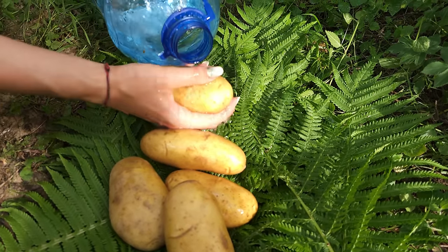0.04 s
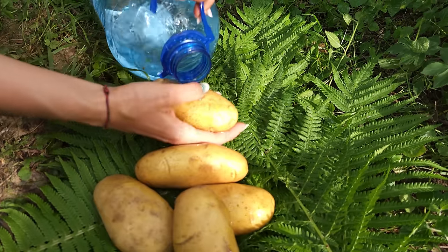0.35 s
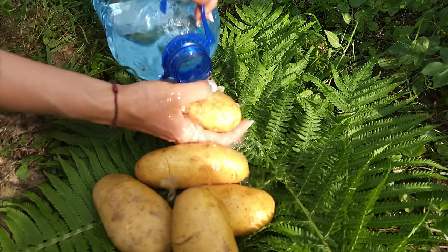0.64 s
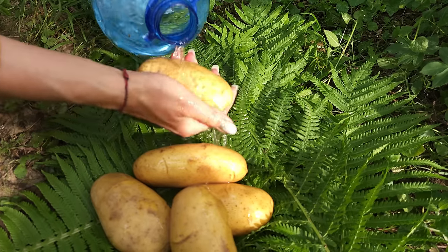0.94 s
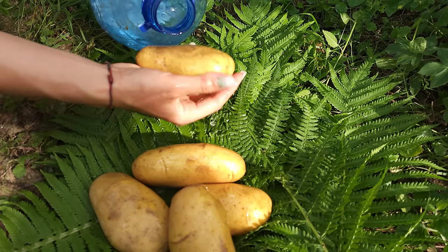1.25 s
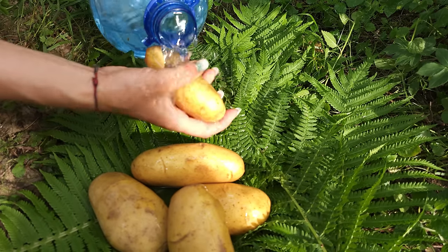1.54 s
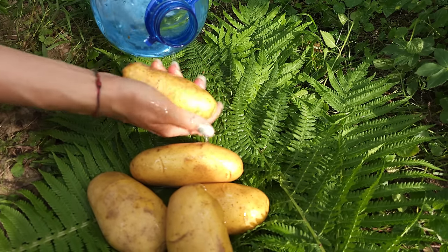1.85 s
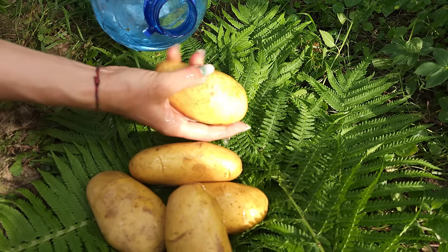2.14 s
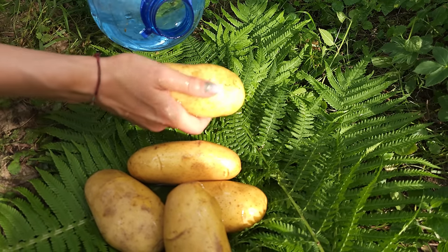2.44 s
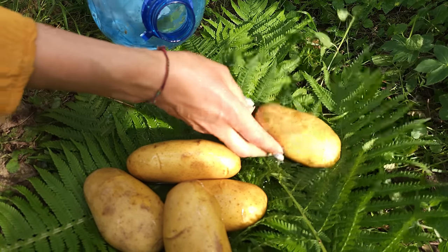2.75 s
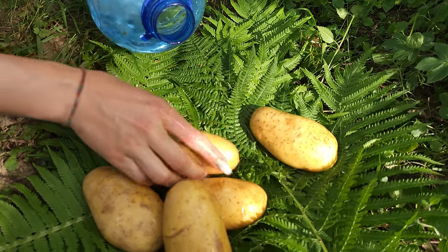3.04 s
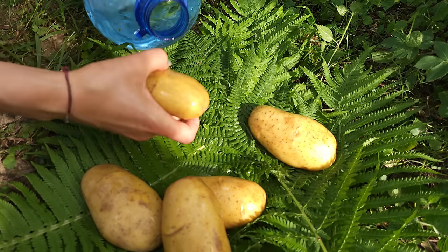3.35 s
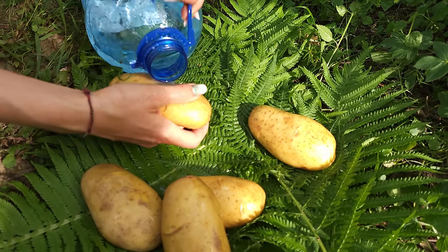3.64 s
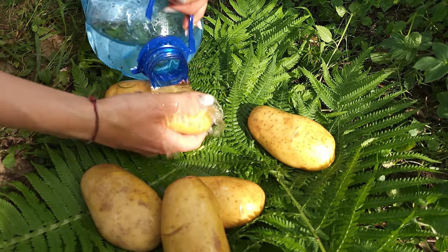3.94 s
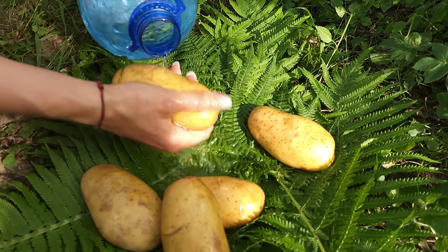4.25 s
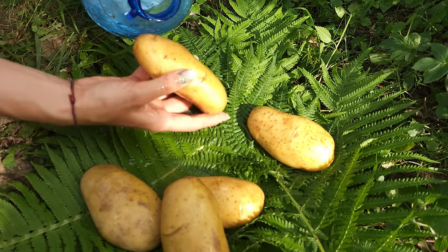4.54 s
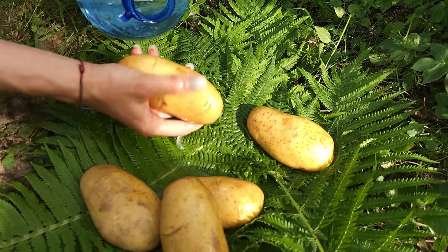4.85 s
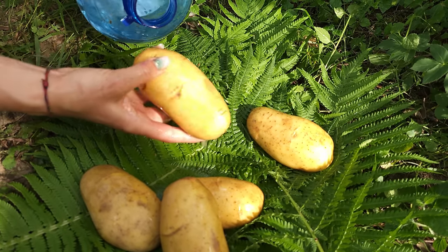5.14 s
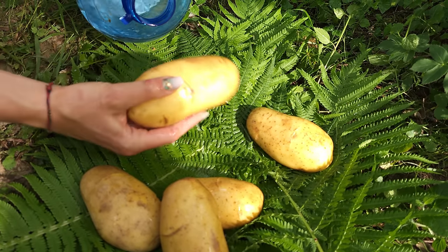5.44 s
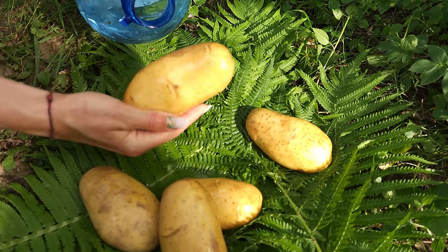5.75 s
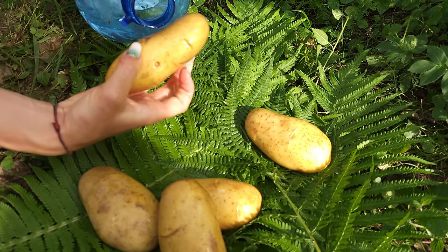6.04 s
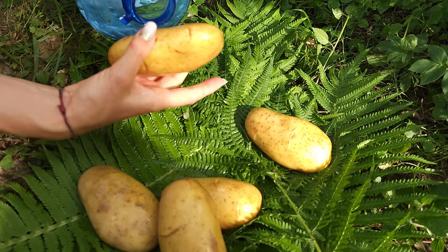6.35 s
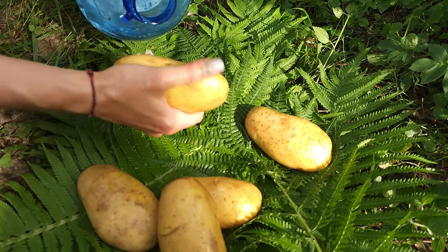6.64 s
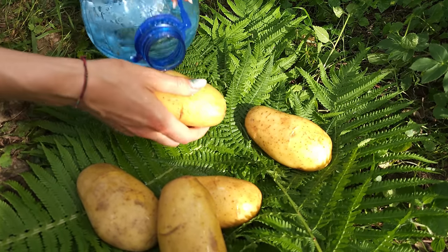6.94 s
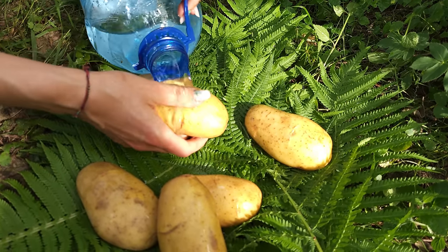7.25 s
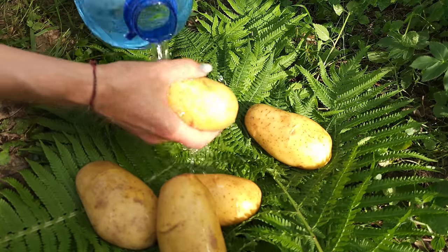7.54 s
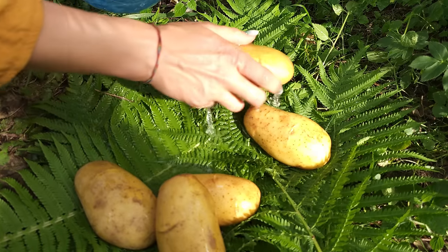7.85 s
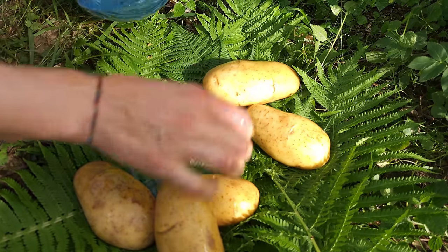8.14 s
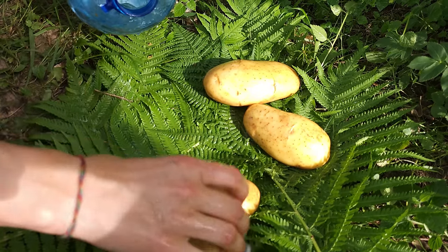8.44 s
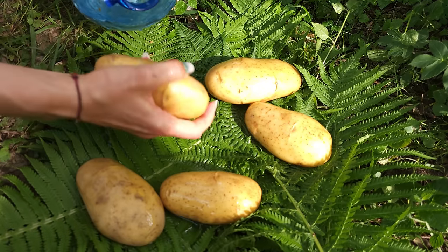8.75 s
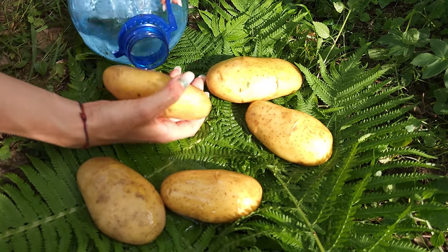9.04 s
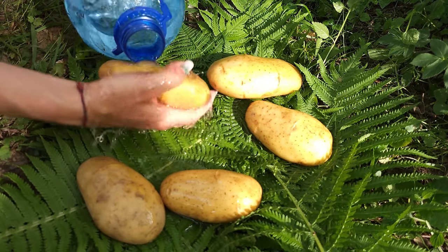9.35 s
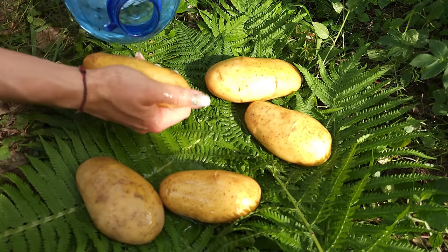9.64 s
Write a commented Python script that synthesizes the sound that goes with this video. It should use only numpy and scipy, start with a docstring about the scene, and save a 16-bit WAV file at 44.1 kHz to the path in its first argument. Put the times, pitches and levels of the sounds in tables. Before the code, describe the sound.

Water splashes from a thumping plastic bottle in short pours as wet hands rub and rinse potatoes.

```python
"""A soft brush of a hand and a hollow boom come first: potatoes are being rinsed over ferns, with water
tipped from a big plastic bottle. Its flexing walls crack and excite damped modes, while the water
inside sloshes and gulps air. The stream trickles over skin and peel as trapped bubbles resonate,
and drops tick on the leaves. Wet hands rub by stick-slip friction and set the potatoes down with
dull thuds, over a faint rumble and hiss."""
import sys
import numpy as np
from scipy import signal
from scipy.fft import rfft, irfft, next_fast_len
from scipy.io import wavfile

SR = 44100
rng = np.random.default_rng(int(sys.argv[2]) if len(sys.argv) > 2 else 0)


def generate_wav(sig):
    """Save sig (samples, or channels by samples) to the path in sys.argv[1] as 16-bit PCM at SR."""
    pcm = np.round(np.clip(np.atleast_2d(sig).T, -1, 1) * 32767).astype(np.int16)
    wavfile.write(sys.argv[1], SR, pcm)


N = 427769

# Spectra of the air, wet rubbing, dragging skin and sloshing water: frequency_hz, relative_db
AIR_SPECTRUM = [(20, -2), (100, 4), (230, -6), (430, -16), (900, -26), (1300, -20), (16000, -28.5)]
RUB_SPECTRUM = [(400, -13), (900, -10), (1300, 0), (2500, -4), (3200, 1), (7600, 1), (10500, -5),
                (11700, -1), (13000, -5), (16000, -7.5)]
DRAG_SPECTRUM = [(950, -13), (1280, -5), (3500, -14.5)]
SLOSH_SPECTRUM = [(25, -29.5), (60, 0), (150, 8), (230, -10), (340, -21), (500, -18), (900, -35.5)]
# Narrow hisses in the background: centre_hz, level_db
HISS_BANDS = [(4630, -73), (11550, -85.5)]
# Potatoes set down on the ferns: start_s, peak_db
SET_DOWNS = [(2.785, -51.5), (7.978, -47)]
# Hand strokes over peel and ferns, skin drags, fingertip squeaks: middle_s, half_length_s, level_db
HAND_STROKES = [(0.237, 0.08, -56.5), (1.108, 0.05, -61.5), (2.13, 0.018, -58.5), (2.782, 0.036, -51),
                (3.326, 0.061, -56), (3.72, 0.24, -62), (4.102, 0.12, -56.5), (4.55, 0.15, -64.5),
                (4.755, 0.054, -62.5), (5.01, 0.054, -63), (6.95, 0.11, -67.5), (7.985, 0.021, -50),
                (8.439, 0.042, -61.5)]
SKIN_DRAGS = [(2.2, 0.32, -69.5), (4.6, 0.13, -67.5)]
FINGER_SQUEAKS = [(2.4, 0.022, -69)]
# Water splats on the leaves: start_s, level_db, t60_s
LEAF_SPLATS = [(0.99, -43, 0.15), (1.642, -50.5, 0.12), (7.722, -38.5, 0.14), (9.599, -45.5, 0.29),
               (9.638, -45, 0.08)]
# Drops on the leaves and larger bubbles in the cupped hand: start_s, relative_peak_db, pitch_hz
LEAF_DROPS = [(0.3082, -41.5, 11740), (0.5173, -39.5, 11600), (0.5672, -41, 7060), (1.4662, -44, 12300),
              (1.6415, -40.5, 6800), (1.6767, -36, 6540), (4.2742, -42, 11600), (4.3395, -40.5, 7040),
              (9.226, -40.5, 11300), (9.3915, -31.5, 6520)]
HAND_PLINKS = [(0.573, -43, 1770), (0.591, -51.5, 1260), (0.807, -52.5, 1400), (0.959, -42, 2300),
               (1.055, -49, 3400), (1.085, -58, 830), (1.235, -63, 990), (1.443, -50, 3130),
               (1.643, -41, 2870), (1.694, -49, 960), (1.73, -52.5, 3460), (1.845, -47, 2720),
               (4.036, -41.5, 2560), (4.059, -36, 4270), (4.208, -45, 1260), (6.189, -58, 1410),
               (7.392, -41.5, 1950), (7.422, -39.5, 3720), (7.6156, -45, 4650), (9.4804, -46, 2870),
               (9.492, -46.5, 2020)]
# Gushes from the tipped bottle hit the hand: start_s, level_db
POURS = [(0.565, -54), (0.975, -61.5), (4.02, -53), (7.388, -55.5), (9.37, -60.5), (9.6, -56)]
# Water gathers in the cupped hand, or sways in the swung bottle: middle_s, half_length_s, level_db
HAND_GURGLES = [(0.66, 0.17, -66.5), (1.07, 0.16, -65.5), (9.62, 0.048, -50.5)]
BOTTLE_SWAYS = [(1.1, 0.98, -59), (8.94, 0.047, -51.5), (9.45, 0.61, -60.5)]
# Air gulps into the bottle: start_s, level_db, pitch_hz, t60_s
AIR_GULPS = [(0.675, -40, 40.6, 0.27), (0.993, -39.5, 156, 0.2), (1.141, -40.5, 171, 0.17),
             (1.543, -42.5, 114.7, 0.42), (1.719, -44, 152, 0.29), (7.391, -43, 37.4, 0.61),
             (7.811, -28.5, 857, 0.1), (9.087, -39, 95, 0.22), (9.372, -24.5, 100, 0.15)]
# Flexes of the bottle wall; wall and crack are relative to the boom, before their trims:
# start_s, boom_db, boom_hz, wall_db, crack_db, ring_time_ratio
WALL_FLEXES = [(0.325, -41, 177, -20, -31, 1.1), (0.673, -32.5, 126.7, -27.5, -19, 0.91),
               (3.544, -21.5, 168.1, -15, -20, 1.12), (3.952, -27, 148, -6.5, -8, 0.77),
               (4.142, -27.5, 158.9, -9, 0, 1.05), (6.071, -32.5, 138.3, -32, -27, 1.3),
               (6.985, -36.5, 144, -25, -24, 0.42), (7.034, -34.5, 166.6, -12.5, -24, .8),
               (7.18, -24, 161.5, -9.5, -12.5, .65), (7.464, -28, 134.6, -10.5, -3.5, 1.1),
               (7.802, -24, 181.2, -15.5, -19.5, 0.56), (7.815, -19, 140, -16, -16, 1.4),
               (8.962, -30.5, 153.4, -14, -30, 0.65), (9.27, -29.5, 156.6, -9.5, -32, 0.49),
               (9.349, -29.5, 128.7, -4, -10, 0.61), (9.662, -37, 170, -12.5, -33, 1.1)]
# Small creases that pop and hardly move the water: start_s, reference_db
CRINKLES = [(4.081, -43.5), (6.253, -58.5), (6.332, -50.5), (6.342, -52.5), (6.474, -52.5), (6.526, -51),
            (8.975, -53.5)]
# Modes of the filled bottle: ratio_to_boom_pitch, relative_db, base_t60_s
BOOM_MODES = [(.58, -17, 0.4), (.84, -8.5, 0.31), (0.999, -1.5, 0.2), (1.239, -8, 0.3), (1.62, -14.5, 0.29)]
# Modes of the bare wall, lowered by WALL_TUNING: base_hz, relative_db, base_t60_s
WALL_MODES = [(282.3, 1, 0.13), (452, 4, 0.14), (520, 1.5, 0.15), (605, -7, 0.16), (800, -7, 0.14)]
# Upper resonances of the plastic: centre_hz, relative_db
CRACK_RESONANCES = [(690, -12), (990, 6.5), (1200, 14.5), (1430, 10.5), (1600, 8.5), (2020, 13.5),
                    (2340, 0.5), (2670, -18), (3500, -7.5)]
# Spectrum of the bright snap of a crease: frequency_hz, relative_db
SNAP_SPECTRUM = [(2100, -15), (2700, -0.5), (3900, -5.5), (5700, -22.5), (7000, -19.5), (14000, -33)]

EAR_LAG_S, CUTOFF_HZ = 0.00017, 15900
WALL_PAN_DB, CRACK_PAN_DB, HAND_PAN_DB = 1.5, 3.5, -1.5  # left minus right
GUSH_RISE_S, DRIBBLE_RISE_S, TYPICAL_GUSH_DB = 0.013, 0.069, -56
BUBBLE_RANGE_DB, BUBBLE_GLIDE = 28, 0.14
STRAYS_PER_S, STRAY_PEAK_DB = 55, -37.5  # rate and greatest peak in a typical gush
STRAY_LOW_HZ, STRAY_HIGH_HZ = 4260, 12900
SAG_SHARE, SAG_S, WAVER_SHARE, WAVERS_PER_S = 0.068, 0.047, 0.07, 90
CREASE_RISE_S, CRACK_WIDTH_HZ, CRACK_DETUNE = 0.003, 82, 0.036
WALL_TUNING, WALL_TRIM_DB, CRACK_TRIM_DB, SNAP_TRIM_DB = 0.9, 7.5, -12.5, 6
REBOUND_S, REBOUND_DB = 0.02624, -8.5  # the wall springs back; level relative to the boom
BOTTLE_LOW_HZ = 44.7  # the bottle's sound is cut below this


def from_db(db):
    """Amplitude grows tenfold with every 20 dB."""
    return 10 ** (np.asarray(db) / 20)


def unit_rms(x):
    """Normalisation to a mean power of 1."""
    return x / np.sqrt(np.mean(x ** 2) + 1e-20)


def add(out, start_s, sound):
    """Superposition: a sound adds to the mix from its start time."""
    start = max(round(start_s * SR), 0)
    out[:, start:start + sound.shape[-1]] += sound[..., :N - start]


def drift(per_s):
    """Random modulation: a line through chance values, rms 1."""
    knots = rng.standard_normal(4000)
    return unit_rms(np.interp(np.arange(N) / SR * per_s, np.arange(len(knots)), knots))


def wobble(t, per_s, count):
    """Independent random modulations, each of spread about 1."""
    knots = rng.standard_normal((count, 64))
    return np.array([np.interp(t * per_s, np.arange(len(row)), row) for row in knots])


def struck(t, rise_s, t60_s):
    """Damping: after a quick rise, amplitude decays exponentially."""
    return (1 - np.exp(-t / rise_s)) * from_db(-60 * t / t60_s)


def swells(rows):
    """Gaussian envelopes add into one smooth amplitude curve."""
    clock = np.arange(0, N, 20) / SR
    level = sum(from_db(db) * np.exp(-np.minimum(((clock - middle_s) / half_s) ** 2, 20))
                for middle_s, half_s, db in rows)
    return np.interp(np.arange(N) / SR, clock, level)


def surges(rows, rise_s, t60_s):
    """Damped envelopes, one for each (start_s, level_db), add into one amplitude curve."""
    clock = np.arange(0, N, 20) / SR
    level = sum(from_db(db) * struck(np.maximum(clock - start_s, 0), rise_s, t60_s)
                for start_s, db in rows)
    return np.interp(np.arange(N) / SR, clock, level)


def coloured(x, spectrum):
    """Spectral shaping: each frequency is weighted by a gain curve; rms 1."""
    size = next_fast_len(x.shape[-1])
    hz, level_db = np.transpose(spectrum)
    gain = from_db(np.interp(np.log(np.fft.rfftfreq(size, 1 / SR) + 1), np.log(hz), level_db))
    return unit_rms(irfft(rfft(x, size) * gain, size)[..., :x.shape[-1]])


def resonate(x, hz, q):
    """A resonator passes a band of width hz / q."""
    return signal.lfilter(*signal.iirpeak(hz, q, fs=SR), x)


def panned(pan_db):
    """Interaural level difference, as left and right gains."""
    return from_db(pan_db * np.array([[.5], [-.5]]))


def at_ears(x):
    """Interaural time difference: sound arrives on the left a little before the right."""
    n = np.arange(len(x))
    return np.array([x, np.interp(n - EAR_LAG_S * SR, n, x, left=0)])


def stereo_noise(spectrum, size, apart_hz):
    """Interaural coherence: noise is alike in the bass and mostly unrelated above apart_hz."""
    highpass = signal.butter(1, apart_hz, "high", fs=SR, output="sos")
    separate = signal.sosfilt(highpass, rng.standard_normal((2, size)))
    shared = at_ears(rng.standard_normal(size))
    shared -= .5 * signal.sosfilt(highpass, shared)
    return coloured(shared + separate, spectrum)


def scattered(x, wet_db, t60_s):
    """Early reflections from hand, bottle and ground follow the direct sound."""
    t = np.arange(SR // 20) / SR
    response = rng.standard_normal((2, len(t))) * from_db(-60 * t / t60_s) * (t > .0006)
    response /= np.sqrt(np.sum(response ** 2, axis=1, keepdims=True))
    return at_ears(x) + from_db(wet_db) * signal.oaconvolve(x[None], response, axes=1)[:, :len(x)]


def bubble(t, hz, cycles, glide):
    """Bubble resonance: trapped air rings down and rises in pitch as it nears the surface."""
    age = t * hz / cycles
    return np.sin(2 * np.pi * hz * t * (1 + glide * np.minimum(age, 1))) * from_db(-60 * age)


def swarm(per_s, low_hz, octaves, tilt_db, cycles):
    """A Poisson process: bubbles ring at random on both sides of the hand, with reflections; rms 1."""
    births = np.flatnonzero(rng.random(N) < per_s / SR)
    direct, t = np.zeros((2, N)), np.arange(SR // 25) / SR
    for at, (pitch, softness, place) in zip(births, rng.random((len(births), 3))):
        note = bubble(t, low_hz * 2 ** (octaves * pitch), cycles, BUBBLE_GLIDE)
        gain = from_db(tilt_db * pitch - BUBBLE_RANGE_DB * softness) / np.sqrt(per_s[at])
        add(direct, at / SR, gain * panned(14 * (place - .5)) * at_ears(note))
    reflected = scattered(direct.mean(axis=0), wet_db=9, t60_s=.04)
    return unit_rms(unit_rms(direct) + unit_rms(reflected))


def air():
    """Ambient noise: a faint broadband rumble and hiss, with two high bands that waver in level."""
    out = from_db(-67.5) * stereo_noise(AIR_SPECTRUM, N, apart_hz=820)
    for hz, db in HISS_BANDS:
        q = hz / 650
        band = resonate(resonate(rng.standard_normal((2, N)), hz, q), hz, q)
        out += from_db(db + 1.5 * drift(per_s=19)) * unit_rms(band)
    return out


def thuds():
    """Damped impact: soft ground takes the weight of a potato with one low tone."""
    out, t = np.zeros((2, N)), np.arange(SR // 4) / SR
    thud = at_ears(np.sin(2 * np.pi * 67.6 * t) * struck(t, rise_s=0.004, t60_s=0.17))
    for start_s, peak_db in SET_DOWNS:
        add(out, start_s, from_db(peak_db) * thud / np.max(np.abs(thud)))
    return out


def squeak():
    """Periodic stick-slip: a fingertip on wet peel gives a faint, unsteady tone."""
    hz = 1980 * (1 + .012 * drift(per_s=90))
    return swells(FINGER_SQUEAKS) * at_ears(np.sin(2 * np.pi * np.cumsum(hz) / SR))


def drags():
    """Friction noise: skin judders over the peel with a soft, nasal rasp."""
    return swells(SKIN_DRAGS) * coloured(rng.standard_normal((2, N)), DRAG_SPECTRUM)


def slipping():
    """Irregular stick-slip: the level of wet rubbing comes in uneven spurts."""
    return unit_rms(from_db(3.5 * np.minimum(drift(per_s=110), 2)))


def film_pops(per_s, spread_db, hiss_db, bands):
    """Film rupture: water tears in tiny pitched pops over a smooth hiss; rms 1."""
    sizes = from_db(spread_db * np.minimum(rng.exponential(1, N), 3.5)) * rng.choice([-1, 1], N)
    clicks = sizes * (rng.random(N) < per_s / SR)
    band_of_click = rng.integers(0, bands, N)
    pops = sum(resonate(clicks * (band_of_click == band) + 1e-18, hz, q=hz / 2200)
               for band, hz in enumerate(np.linspace(1800, 15500, bands)))
    pops = scattered(pops, wet_db=1, t60_s=.03)[::-1]  # the fingers are nearer the right ear
    return coloured(unit_rms(pops) + from_db(hiss_db) * rng.standard_normal((2, N)), RUB_SPECTRUM)


def swishes():
    """Friction and impact shape a fine spray of pops: strokes swell and fade, splats start at once."""
    level = (swells(HAND_STROKES) * slipping())[None]
    t = np.arange(SR // 2) / SR
    for start_s, level_db, t60_s in LEAF_SPLATS:
        add(level, start_s, from_db(level_db) * struck(t, 0.00081, t60_s))
    return level * film_pops(per_s=4200, spread_db=4.5, hiss_db=1, bands=8)


def wet_hands(flow_db):
    """Wet friction: fingers crackle and squelch on the peel, and the stream spatters on them."""
    wetness = surges(POURS, DRIBBLE_RISE_S, t60_s=3.1)
    grip = from_db(2.5 * np.tanh(drift(per_s=9)))  # tightens and slackens
    rub = (from_db(-73) + from_db(-16) * wetness) * grip
    spatter = from_db(flow_db + 1.5)
    level = np.hypot(rub, spatter) * slipping()
    crackle = level * film_pops(per_s=550, spread_db=7.5, hiss_db=1.5, bands=16)
    squelches = swarm(per_s=np.full(N, 16), low_hz=1400, octaves=1.4, tilt_db=3, cycles=11)
    return crackle + rub * from_db(-10) * squelches


def stream_db():
    """Exponential run-off sets the stream's level: each pour is a gush and a long dribble."""
    gush = surges(POURS, GUSH_RISE_S, t60_s=0.94)
    dribble = from_db(-18.5) * surges(POURS, DRIBBLE_RISE_S, t60_s=4.4)
    return 20 * np.log10(gush + dribble + 1e-9)


def stray_drops(flow_db):
    """Poisson arrivals, thicker and harder in a gush: rows of start_s, peak_db, pitch_hz."""
    excess_db = flow_db - TYPICAL_GUSH_DB
    expected_count = np.cumsum(STRAYS_PER_S * from_db(excess_db)) / SR
    wait, softness, pitch = rng.random(size=(400, 3)).T
    landings = np.searchsorted(expected_count, np.cumsum(-np.log(1 - wait)))
    peak_db = STRAY_PEAK_DB - 4 * np.minimum(-np.log(1 - softness), 2)
    pitch_hz = STRAY_LOW_HZ * (STRAY_HIGH_HZ / STRAY_LOW_HZ) ** pitch
    return [(at / SR, db + 0.45 * excess_db[at], hz)
            for at, db, hz in zip(landings, peak_db, pitch_hz) if at < N - SR // 100]


def drips(rows, cycles, glide, tick_db, gain_db=0):
    """Drop impact: a bright tick and the short note of an entrained bubble."""
    out, t = np.zeros((2, N)), np.arange(SR // 10) / SR
    onset = 1 - np.exp(-t / 0.00011)  # a very short fade-in softens each drop's tick
    for start_s, peak_db, hz in rows:
        tick = np.diff(rng.standard_normal(len(t) + 1)) * from_db(-60 * t / .012)
        note = (bubble(t, hz, cycles, glide) + from_db(tick_db) * tick) * onset
        sound = scattered(note, wet_db=2, t60_s=0.063)
        add(out, start_s, from_db(peak_db + gain_db) * sound / np.max(np.abs(sound)))
    return out


def gurgle():
    """Larger bubbles resonate lower: a quickly damped crowd forms in the cupped hand."""
    bubbles = swarm(per_s=np.full(N, 130), low_hz=297, octaves=2.6, tilt_db=-7, cycles=14.6)
    return swells(HAND_GURGLES) * bubbles


def trickle():
    """Air entrainment: each gush makes small chirping bubbles, more of them the harder it runs."""
    level = surges(POURS, GUSH_RISE_S, t60_s=0.83)
    per_s = np.clip(300 * np.sqrt(level / from_db(TYPICAL_GUSH_DB)), 100, 1200)
    return level * swarm(per_s, low_hz=1150, octaves=2.2, tilt_db=5, cycles=42)


def slosh():
    """Forced sloshing: swings and booms stir the bottle's water into a lumpy, hollow murmur."""
    stirred = sum(surges([(start_s, boom_db)], rise_s=0.0085, t60_s=0.77 * ring)
                  for start_s, boom_db, *_, ring in WALL_FLEXES)
    level = from_db(-83.5) + swells(BOTTLE_SWAYS) + from_db(-23.5) * stirred
    lumps = from_db(2 * drift(per_s=25))
    return level * lumps * stereo_noise(SLOSH_SPECTRUM, N, apart_hz=1500)


def glugs():
    """Bubble resonance in the bottle: each gulp of air rings and rises slightly in pitch."""
    out, t = np.zeros((2, N)), np.arange(SR // 2) / SR
    onset = 1 - np.exp(-t / 0.0026)
    for start_s, level_db, hz, t60_s in AIR_GULPS:
        note = onset * bubble(t, hz, cycles=hz * t60_s, glide=0.083)
        add(out, start_s, from_db(level_db) * at_ears(note))
    return out


def ringing(modes, t, tuning, ring, detune, rise_s):
    """Modal vibration: damped sines, frequencies scaled by tuning and decay times by ring; peak 1."""
    base, level_db, t60_s = np.transpose(modes)[:, :, None]
    mistune, strength, phase = rng.standard_normal((3, len(modes), 1))
    sag = SAG_SHARE * np.exp(-t / SAG_S)  # the strained wall rings sharp, then relaxes
    waver = WAVER_SHARE * wobble(t, WAVERS_PER_S, len(modes))  # the water shifts
    bend = 1 + detune * mistune + sag + waver
    waves = np.sin(2 * np.pi * tuning * base * np.cumsum(bend, axis=1) / SR + np.pi * phase)
    sound = np.sum(from_db(level_db + 2 * strength) * waves * struck(t, rise_s, t60_s * ring), axis=0)
    return at_ears(sound / np.max(np.abs(sound)))


def crease(t):
    """Buckling: a crease runs across the plastic and excites resonances that shift with each grip."""
    buckling = rng.standard_normal(len(t)) * struck(t, CREASE_RISE_S, t60_s=.036)
    tunings = 1 + CRACK_DETUNE * rng.standard_normal(len(CRACK_RESONANCES))
    sound = sum(from_db(db) * resonate(buckling, hz * tuning, q=hz / CRACK_WIDTH_HZ)
                for (hz, db), tuning in zip(CRACK_RESONANCES, tunings))
    return unit_rms(at_ears(sound))


def flex(out, start_s, boom_db, boom_hz, wall_db, crack_db, snap_db, ring):
    """Impulse response of the bottle: a crack and snap, a hollow wall ring, a boom and its rebound."""
    t = np.arange(SR // 3) / SR
    brief = t[:SR // 10]
    boom = ringing(BOOM_MODES, t, boom_hz, ring, detune=0.019, rise_s=0.0021)
    wall = ringing(WALL_MODES, t, WALL_TUNING, ring, detune=0.0433, rise_s=0.00071)
    wall *= from_db(wall_db + WALL_TRIM_DB) * panned(WALL_PAN_DB)
    crack = from_db(crack_db + CRACK_TRIM_DB) * crease(brief) * panned(CRACK_PAN_DB)
    snap = stereo_noise(SNAP_SPECTRUM, len(brief), apart_hz=2960)
    snap *= from_db(snap_db + SNAP_TRIM_DB) * struck(brief, CREASE_RISE_S, t60_s=0.027)
    rebound = ringing(BOOM_MODES, t, boom_hz, ring, detune=0, rise_s=0.0007)
    add(out, start_s, from_db(boom_db) * (boom + wall))
    add(out, start_s, from_db(boom_db) * (crack + snap))
    add(out, start_s + REBOUND_S, from_db(boom_db + REBOUND_DB) * rebound)


def bottle():
    """Radiation from a thin shell: large flexes and small crinkles, with the deepest bass cut away."""
    out = np.zeros((2, N))
    for start_s, boom_db, boom_hz, wall_db, crack_db, ring in WALL_FLEXES:
        snap_db = 1.23 * crack_db + 3  # the harder the crack, the brighter
        flex(out, start_s, boom_db, boom_hz, wall_db, crack_db, snap_db, ring)
    for start_s, db in CRINKLES:
        flex(out, start_s, boom_db=db - 2, boom_hz=140.7, wall_db=-10, crack_db=2, snap_db=12.5, ring=1)
    return signal.sosfilt(signal.butter(2, BOTTLE_LOW_HZ, "high", fs=SR, output="sos"), out)


def scene():
    """Superposition of hands, water and bottle, close by, over the ambient noise."""
    flow_db = stream_db()
    ticks = drips(LEAF_DROPS, cycles=19.7, glide=0.017, tick_db=-11.5, gain_db=5.0)
    plinks = drips(HAND_PLINKS, cycles=18, glide=0.064, tick_db=-18, gain_db=3.5)
    hands = (wet_hands(flow_db) + drags() + squeak() + swishes() + ticks) * panned(HAND_PAN_DB)
    water = glugs() + slosh() + trickle() + gurgle() + plinks
    mix = hands + water + bottle() + thuds() + air()
    strays = drips(stray_drops(flow_db), cycles=24, glide=0.029, tick_db=-6.5)
    return mix + strays


def record(dry):
    """Low-pass filtering: the highest treble is cut steeply."""
    return signal.sosfilt(signal.ellip(10, .1, 80, CUTOFF_HZ, fs=SR, output="sos"), dry)


dry = scene()
out = record(dry)
generate_wav(out)
```